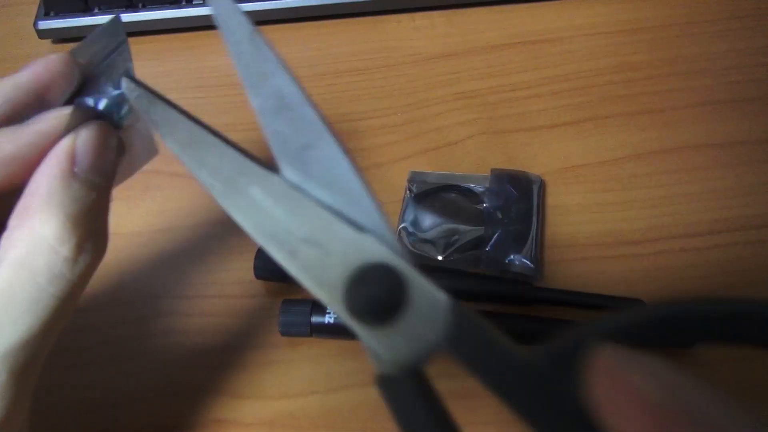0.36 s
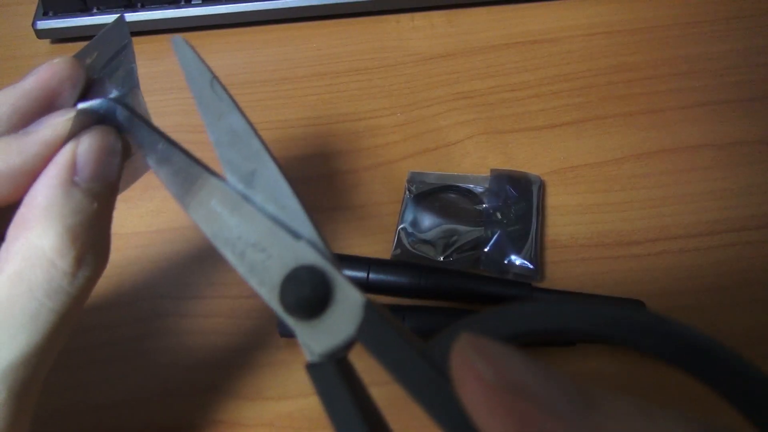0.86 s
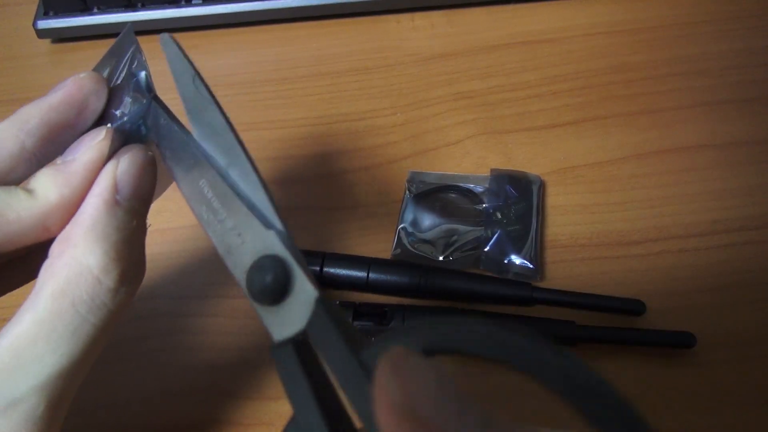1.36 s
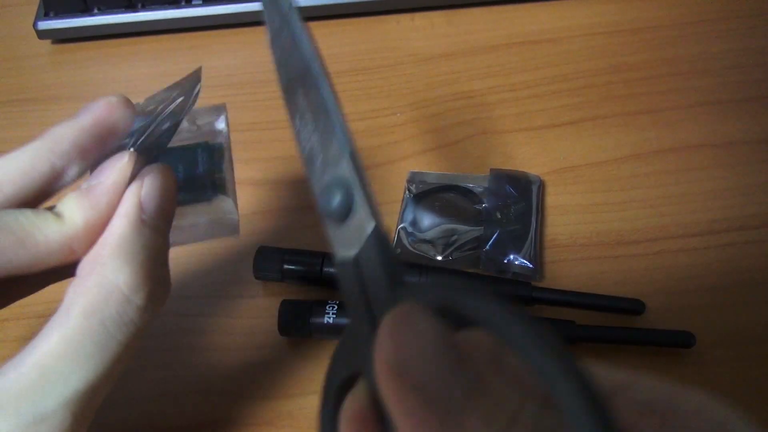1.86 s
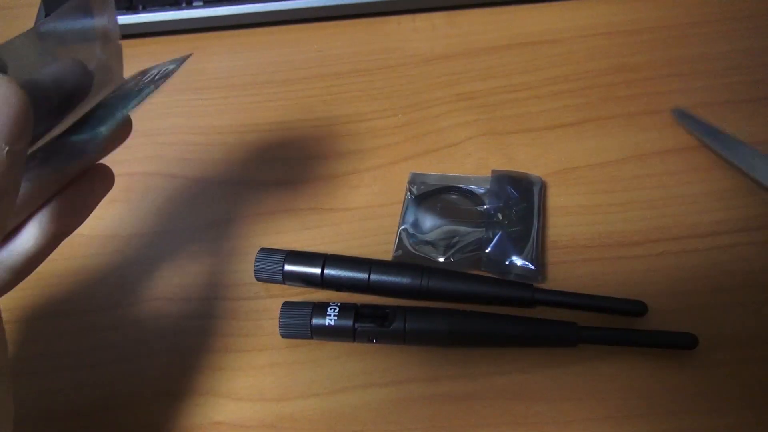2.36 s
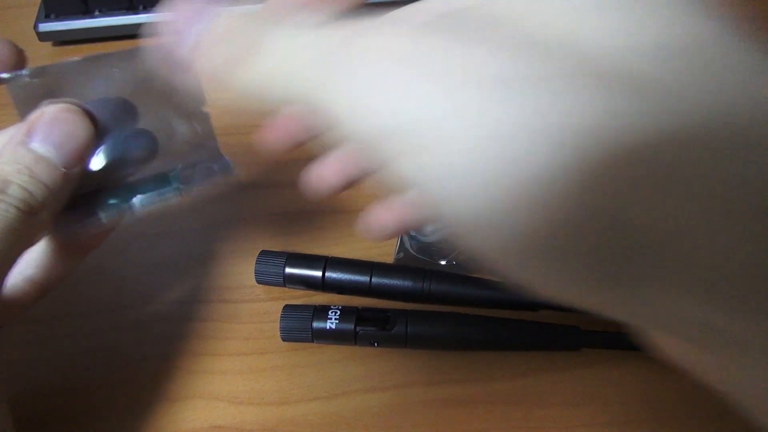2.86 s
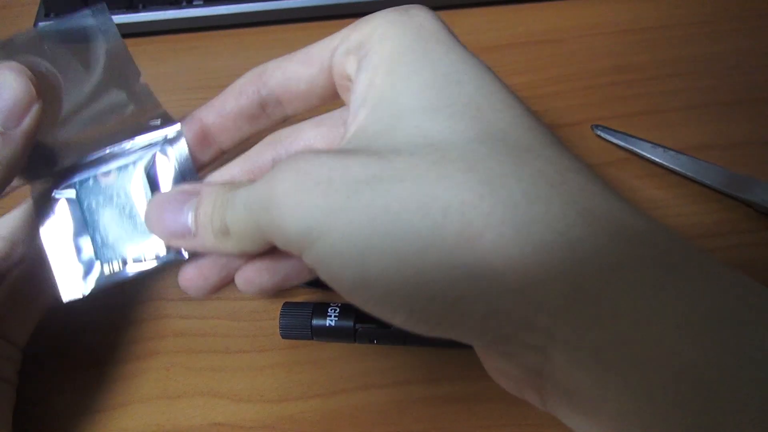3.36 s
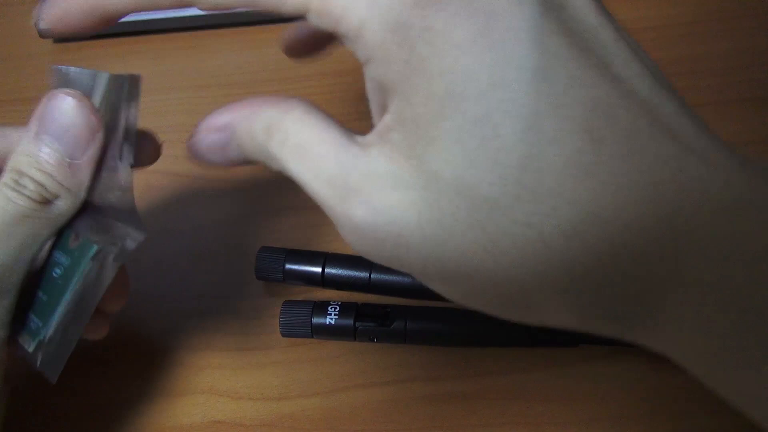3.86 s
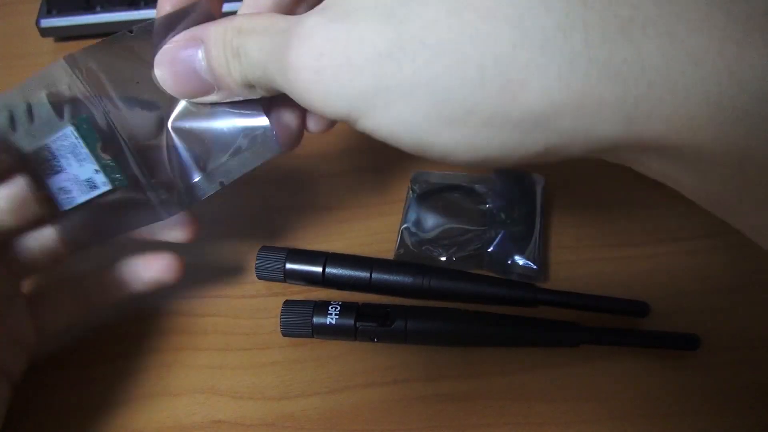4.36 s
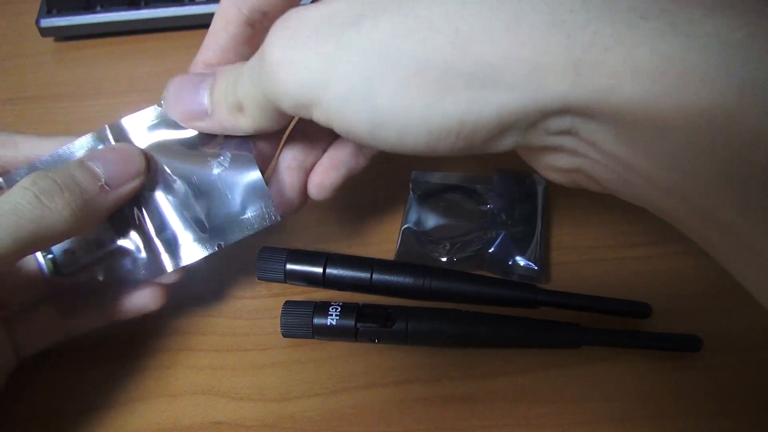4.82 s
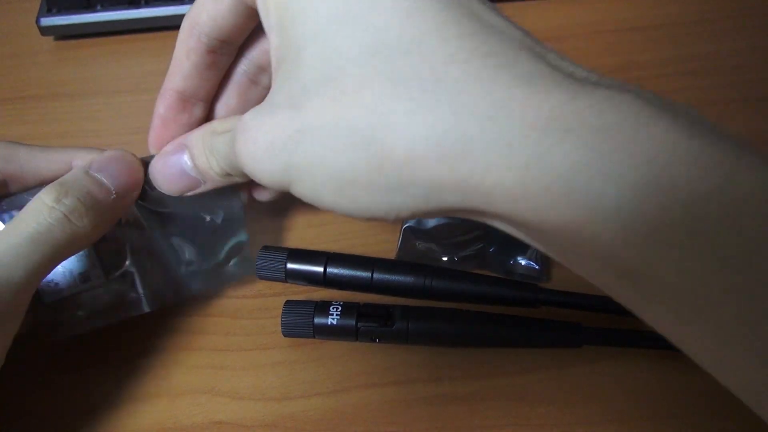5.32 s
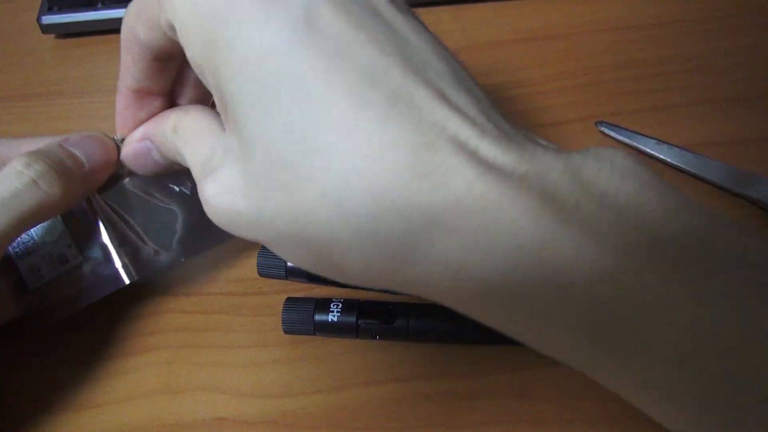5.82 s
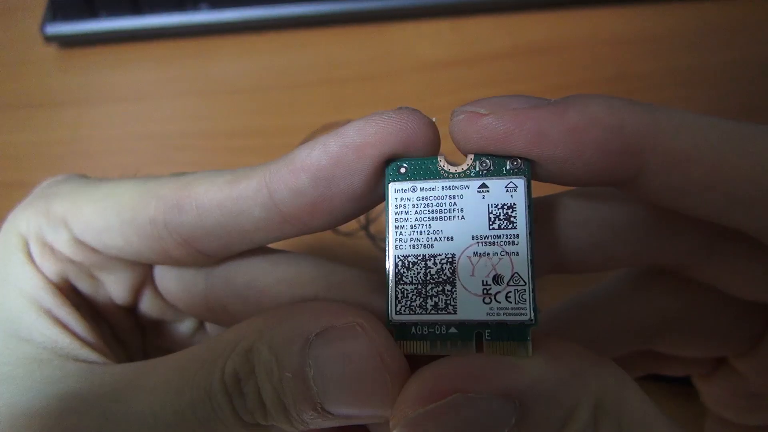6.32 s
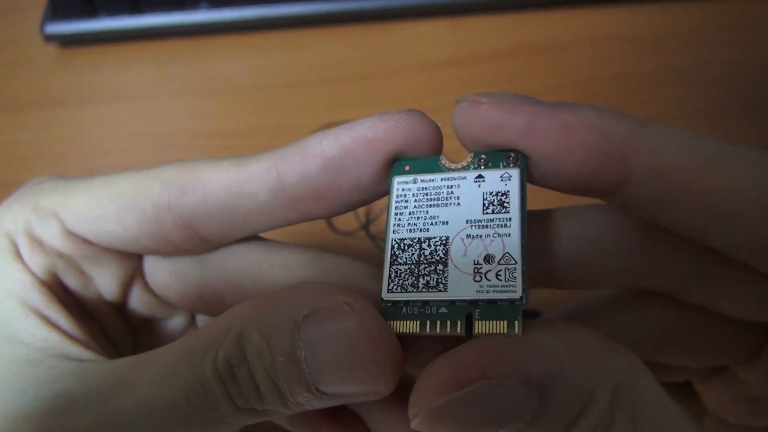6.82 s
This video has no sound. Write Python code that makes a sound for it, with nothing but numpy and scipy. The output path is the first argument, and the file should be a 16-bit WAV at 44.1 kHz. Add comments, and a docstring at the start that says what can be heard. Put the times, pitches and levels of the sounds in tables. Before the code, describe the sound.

A crisp scissor snip, a bouncing clatter of metal and plastic on wood, then dry, sharp crinkling of a small foil bag over soft room hiss.

```python
"""Foil bag and scissors on a desk

Close microphone over a wooden desk: hands squeeze a small foil bag, scissors snip it and are dropped on the desk,
then fingers rub and open the bag, whose creases snap. A quiet room hums and hisses behind.
Snaps, bounces and jolts are crowds of damped modes; rubs, snip and background are coloured noise.
A short diffuse tail gives the room, and two microphone ports give the stereo."""
import sys
import numpy as np
from scipy import signal
from scipy.fft import rfft, irfft, next_fast_len
from scipy.io import wavfile
from scipy.ndimage import map_coordinates

SR = 44100
rng = np.random.default_rng(int(sys.argv[2]) if len(sys.argv) > 2 else 0)


def file_out(sig):
    """Save sig as 16-bit WAV at sys.argv[1]."""
    # one column per channel
    cols = np.atleast_2d(sig).T
    # limit, then scale
    lim = np.clip(cols, -1, 1)
    pcm = np.round(lim * 32767).astype(np.int16)
    wavfile.write(sys.argv[1], SR, pcm)


def voltage_ratio(decibels):
    """Convert decibels (scalar or array-like) to amplitude ratios, 20 dB per decade."""
    exponent = np.asarray(decibels, float) / 20
    return 10 ** exponent


N = 306495  # length in samples

# creases snapping, and at 1.859 and 1.871 s the blades snipping, made alike: (time [s], strength [dB], pitch of
# the crease [Hz], focus: loss away from that pitch [dB per octave], strength of the whole bag's thump [dB])
SNAPS = [(0.1695, -26.5, 930, 3.0, -27), (0.1973, -24, 12000, 14, -47), (0.3873, -45.5, 7650, 8, -63.0),
         (0.8826, -39, 1690, 2.5, -44.5), (1.0047, -33, 1890, 3, -38.5), (1.5029, -28.5, 1960, 9, -45),
         (1.6301, -41.5, 1960, 9, -55), (1.6944, -47.5, 1930, 4, -72.0), (1.82, -20.5, 7240, 17, -46),
         (1.859, -11, 9100, 3, -27), (1.8714, -5.5, 11600, 8.5, -60), (2.1927, -27, 2370, 5, -36),
         (2.2114, -34, 680, 2.5, -36), (2.3048, -25, 3450, 6, -34), (2.3276, -25, 1580, 1.5, -22.5),
         (3.0111, -27.5, 1920, 3.5, -35.5), (3.087, -33, 10610, 5, -60.0), (3.0988, -41, 590, 8, -35.0),
         (3.1106, -39, 1690, 5, -45), (3.174, -34.0, 1970, 13.5, -63.0), (3.2013, -17.5, 2020, 20, -60),
         (3.2775, -12, 5240, 2, -32.5), (3.4945, -9.5, 3970, 5, -25.5), (3.553, -33.0, 590, 2.5, -29),
         (3.5746, -28.5, 590, 2.5, -31), (3.654, -12.0, 6600, 4, -31), (3.721, -43, 8500, -2, -45.0),
         (3.748, -12.5, 6800, 4.5, -22), (3.7858, -19.5, 5500, 7, -55.0), (3.7951, -23.5, 1930, 3, -55),
         (3.8051, -41.0, 590, 5, -45), (4.0329, -32, 830, 2.5, -32), (4.1163, -42.5, 6610, -0.5, -46.5),
         (4.1298, -42.5, 590, 3, -41), (4.1889, -19.5, 3280, 8.5, -54.5), (4.2179, -12, 1290, 5, -16.5),
         (4.2492, -9.5, 5000, 5, -21), (4.2543, -0.5, 2700, 8.5, -14), (4.2753, -32, 590, 1.5, -29.5),
         (4.3048, -17, 1970, 5.5, -27), (4.3194, -15.5, 2840, 8, -23.5), (4.3445, -34, 2620, 2, -34),
         (4.3602, -26.5, 1050, 5, -31.5), (4.3696, -10, 2560, 10.5, -26), (4.3814, -26, 1350, 6, -35),
         (4.402, -28, 1710, 7, -47.0), (4.5124, -32, 1110, 0.5, -28.5), (4.5667, -33.5, 3020, 6.5, -67.0),
         (4.638, -19, 2080, 10, -40), (4.653, -7.5, 2270, 6.5, -37.5), (4.7128, -30, 830, 1, -24.5),
         (4.8042, -28, 1770, 2.0, -28.5), (4.9, -40.5, 1630, 2.5, -43), (4.9619, -26.5, 5260, 2.5, -61),
         (4.9675, -23, 2370, 8.5, -48), (4.9795, -24, 2230, 14, -58.0), (5.044, -32.5, 5160, 7, -64.0),
         (5.124, -6, 3020, 11, -35), (5.1692, -32.5, 4050, 7, -60), (5.1766, -22.5, 6100, 13.5, -60.0),
         (5.3074, -35, 710, 4.5, -37.5), (5.4167, -34.5, 1300, 3, -37.0), (5.423, -38, 4700, 9, -58.0),
         (5.553, -32.5, 2000, 14, -51), (5.6681, -46.5, 3780, 4, -45), (5.7647, -12, 5720, 7.0, -36.0),
         (5.822, -21, 1370, 7, -33.5), (5.964, -37, 11700, 6.5, -70), (6.0031, -15.5, 1910, -0.5, -50),
         (6.05, -29, 3430, 6.5, -48), (6.1268, -42, 11810, 6.5, -69.0)]


def unit(x):
    """Scaled to rms 1."""
    return x / np.sqrt(np.mean(x ** 2) + 1e-20)


def along(points, hz):
    """(Hz, value) points read on a log frequency axis."""
    f, v = np.transpose(points)
    return np.interp(np.log(hz + 1), np.log(f + 1), v)


def above(x, hz):
    """High-pass: keeps deep bass out of the sound."""
    return signal.sosfilt(signal.butter(2, hz, "high", fs=SR, output="sos"), x)


def wobble(rate):
    """A smooth random curve, rate knots a second."""
    knots = rng.standard_normal(int(N * rate / SR) + 4)
    return map_coordinates(knots, [np.arange(N) * rate / SR])


def rush(spectrum):
    """Stereo noise of rms 1 in the given colour, its two sides more or less alike by frequency."""
    # likeness of left and right: (frequency [Hz], correlation [0 to 1])
    alike = [(60, 0.67), (300, 0.93), (1000, .9), (3000, 1), (7000, 0.92), (15000, 1)]
    size = next_fast_len(N)
    hz = np.fft.rfftfreq(size, 1 / SR)
    turn = np.arccos(np.clip(along(alike, hz), 0, 1)) / 2
    white = rfft(rng.standard_normal((2, size)))
    pair = white * voltage_ratio(along(spectrum, hz)) * [np.cos(turn), np.sin(turn)]
    mid, side = irfft(pair, size)[:, :N]
    return unit(np.array([mid + side, mid - side]))


def ring(hz, db, t60, rise_s, size, rough=0):
    """Damped modes at random phase and strength; rough lets each phase wander, as loose contact does."""
    t = np.arange(size)[:, None] / SR
    phase, scatter_db = rng.uniform(0, 2 * np.pi, len(hz)), rng.normal(0, 1.2, len(hz))
    wander = rough * np.cumsum(rng.standard_normal((size, len(hz))), axis=0) / np.sqrt(SR)
    decay = voltage_ratio(db + scatter_db - 60 * t / t60)
    modes = decay * np.sin(2 * np.pi * hz * t + phase + wander)
    return modes.sum(axis=1) * (1 - np.exp(-t[:, 0] / rise_s))


def air():
    """Wavering rumble, hum and mid murmur of machines under the microphone's hiss, all following one swell."""
    # course of the background, lowest near the end: (time [s], level [dB])
    course = [(0, -67), (.7, -71.5), (2.3, -70.5), (3.1, -66.5), (3.5, -64.5), (4, -68), (4.5, -68),
              (4.9, -67.5), (5.4, -66), (5.95, -69), (6.16, -70.5), (6.2, -75), (6.95, -73.5)]
    # rumble, hum, murmur, hiss: (level over the background [dB], how far it follows the swell [share])
    layers = [(-1, 0.74), (-2, 0.94), (.5, 1.05), (-1, 1)]
    # colours of the four layers: (frequency [Hz], level [dB])
    rumble_colour = [(20, -35), (30, -8), (80, 0), (150, -3), (230, -7.5), (350, -41.5)]
    hum_colour = [(190, -44), (235, -9), (255, -10.5), (280, -9.5), (330, -42.5)]
    murmur_colour = [(200, -16.5), (350, -2), (700, -6), (1500, -9.5), (2500, -14), (4000, -41)]
    hiss_colour = [(1500, -30.5), (2800, 0.5), (4000, -1), (7000, 0.5), (9000, -3), (12000, -2.5),
                   (15500, -3.5), (20000, -7.5)]
    s, db = np.transpose(course)
    swell_db = np.interp(np.arange(N) / SR, s, db - db.mean())
    rumble, hum, murmur, hiss = (voltage_ratio(db.mean() + over_db + follows * swell_db) for over_db, follows in layers)
    low = rumble * voltage_ratio(1.0 * wobble(6.2)) * rush(rumble_colour)
    low += hum * voltage_ratio(1.6 * wobble(4.4)) * rush(hum_colour)
    middle = murmur * voltage_ratio(0.8 * wobble(3.6)) * rush(murmur_colour)
    return low + middle + hiss * rush(hiss_colour)


def room(x):
    """A diffuse tail, drawn anew every quarter second, each frequency dying at its own speed."""
    # decay of the room: (frequency [Hz], t60 [s])
    decay = [(200, .28), (800, .28), (2000, .24), (6000, .24), (15000, .18)]
    out, step = np.zeros((2, N + 2 * SR)), SR // 4
    for start in range(0, N, step):
        hz, t, z = signal.stft(rng.standard_normal((2, SR // 3)), SR, nperseg=256)
        z[1] = 1.1 * z[0] + 0.2 * z[1]  # both sides nearly alike
        fading = z * voltage_ratio(-60 * t / along(decay, hz)[:, None])
        tail = signal.istft(fading, SR, nperseg=256)[1]
        wet = signal.fftconvolve(x[None, start:start + step], tail / np.linalg.norm(tail[0]), axes=1)
        out[:, start + 120:][:, :wet.shape[1]] += wet  # 120 samples after the direct sound
    return out[:, :N]


def jolts():
    """A soft low push wakes only the lowest modes of the desk."""
    # soft pushes of hand or handle on the desk top: (time [s], level [dB])
    pushes = [(1.859, -48), (2.446, -37.5), (2.585, -34), (2.997, -36), (3.21, -43), (3.748, -42),
              (4.034, -51.5), (4.218, -39), (4.253, -24.5), (4.319, -47), (4.802, -41.5), (5.306, -51),
              (5.762, -44.5)]
    hz, t60 = np.array([84, 127, 199.1, 251.0]), np.array([.06, .07, .08, .13])
    loss_db = np.array([14, 8.1, 3.6, 8.9])
    out, size = np.zeros(N + SR), SR // 5
    for s, db in pushes:
        out[round(s * SR):][:size] += ring(hz, db - loss_db, t60, rise_s=0.0053, size=size)
    return out[:N]


def snip():
    """The closed blades shimmer in a dense band of high modes, made as fading noise."""
    # the blades closing: (time [s], rms level at the start [dB])
    closing = (1.876, -45)
    # colour of the shimmer: (frequency [Hz], level [dB])
    shimmer = [(4500, -30), (6100, -9), (8300, -12), (9300, -2.5), (10600, 0), (11400, -11), (15500, -13)]
    t = np.arange(N) / SR - closing[0]
    fade = voltage_ratio(closing[1] - 60 * np.abs(t) / .32)  # t60 0.32 s
    return (t > 0) * fade * rush(shimmer)[0]


def scissors():
    """Every bounce thuds the desk, knocks the handles, clinks the blades with a short crack and leaves a rattle."""
    # bounces on the desk: (time [s], level of desk thud [dB], of handle knock [dB], of blade clink [dB])
    blows = [(2.417, -48.5, -55.5, -54), (2.4485, -24, -22, -14), (2.478, -29, -36.5, -20.5),
             (2.4914, -32, -35.5, -21.5), (2.509, -32.5, -24.5, -32.5), (2.5875, -12.5, -9, -25),
             (2.596, -16, -19.5, -22.5), (2.614, -37.5, -22, -13.5), (2.6279, -28, -27.5, -16.5),
             (2.6411, -23.5, -23, -29.5), (2.648, -26, -21.5, -34.5), (2.6634, -32, -38, -34.5),
             (2.6767, -31.5, -39.5, -37), (2.7514, -39, -25, -24), (2.7605, -20.5, -23, -20),
             (2.7867, -23.5, -21, -24), (2.811, -26.5, -49, -55), (2.8357, -28, -25.5, -34),
             (2.8467, -34.5, -30, -57), (2.992, -38.5, -45, -63), (3.0216, -36.5, -40.5, -52.5),
             (3.202, -43, -39.5, -51)]
    # modes of desk top, plastic handles and steel blades: (frequency [Hz], level [dB],
    # t60 [s], for handles and blades when fully free)
    desk = [(119, -13, 0.12), (206, -12.5, 0.13), (268.6, -8.5, 0.23), (420, -10, 0.086), (540, -2, 0.11),
            (695.7, -3, 0.15), (838.5, 1.5, 0.094)]
    handles = [(1223, -8, 0.24), (1302, -2, 0.25), (1405, -5.5, 0.26), (1603, -7.5, .16),
               (2030, -9.5, 0.23), (2387, -12.5, 0.31)]
    blades = [(2810, -11, 0.14), (3065, -20.5, 0.39), (3250, -11.5, .35), (3920, -11, 0.59),
              (4400, -14.5, 0.12), (5140, -8, 0.44), (5370, -10, .5), (6025, -11.5, 0.13),
              (6200, -11, 0.16), (6600, -13.5, 0.072), (7000, -9, 0.16), (7570, -10.5, .22),
              (8750, -11, 0.17), (9160, -10, 0.23), (9700, -22, .15), (10400, -16.5, .18),
              (11290, -16, .18), (11700, -18, .18), (14400, -30, .1)]
    # how freely handles and blades ring, less as the scissors lie flatter: (time [s], share of t60)
    freely = [(2.55, 1.1), (2.59, .3), (2.76, .25)]
    # how far the phase of desk, handle and blade modes wanders [radians per root second]
    loose = {"desk": 8, "handles": 17, "blades": 14}
    # dull rattle of loose parts after a bounce: (frequency [Hz], level [dB])
    rattle_colour = [(60, -33.5), (150, -14.5), (600, 10.5), (1400, -6), (3000, -7), (6000, -18.5),
                     (12000, -25), (16000, -40)]
    out, size = np.zeros(N + SR), SR // 3
    t, rattle = np.arange(size) / SR, rush(rattle_colour)[0]
    for s, thud_db, knock_db, clink_db in blows:
        start, freedom = round(s * SR), np.interp(s, *np.transpose(freely))
        hz, db, t60 = np.transpose(desk)
        blow = ring(hz, db + thud_db - 9, t60, rise_s=0.002, size=size, rough=loose["desk"])
        hz, db, t60 = np.transpose(handles)
        blow += ring(hz, db + knock_db - 6, t60 * freedom, rise_s=0.0004, size=size, rough=loose["handles"])
        hz, db, t60 = np.transpose(blades)
        blow += ring(hz, db + clink_db - 18, t60 * freedom, rise_s=0.00028, size=size, rough=loose["blades"])
        # the first contact chokes most of the ring
        blow += ring(hz, db + clink_db, 0.017, rise_s=0.00033, size=size)
        crack = np.diff(rng.standard_normal(size + 1))
        blow += voltage_ratio(clink_db - 15.5 - 60 * t / 0.027) * crack
        blow += voltage_ratio(thud_db - 15 - 60 * t / 0.13) * rattle[start:start + size]
        bright_rattle = np.diff(rattle[start:start + size + 1])  # from the pivot
        blow += voltage_ratio(clink_db - 15.5 - 60 * t / 0.25) * bright_rattle
        out[start:][:size] += blow
    return above(out[:N], hz=85)


def rubs():
    """Sliding contact: noise in four registers, roughened by stick-slip grains, shaped over each stroke."""
    # fingers and blades sliding on foil: (start [s], relative length, level [dB],
    # brightness [dB per octave], extra sizzle [dB])
    strokes = [(0.144, 0.062, -52, 4, -7), (0.265, 0.026, -77, 1.5, 5), (0.36, 0.05, -75, 1.5, 2),
               (0.935, 0.11, -73, 1.5, 2), (1.809, 0.02, -55.5, 5, 3.5), (1.829, 0.02, -52.5, 3.0, 0),
               (2.419, 0.033, -67.5, -2.5, -6), (3.083, 0.033, -63, 1, 1), (3.29, 0.07, -67.5, -8, -8),
               (3.51, 0.11, -76, -10, -6), (3.609, 0.043, -70.5, 4.0, 8), (3.656, 0.13, -48, -1.5, 3),
               (3.763, 0.044, -49, -9, -2), (3.913, 0.065, -73.5, 4.0, 2), (4.019, 0.099, -63.5, 0.0, 2),
               (4.173, 0.079, -59, 0.5, 6), (4.226, 0.12, -45.5, -1.5, -4), (4.333, 0.093, -56.5, -3.5, -7),
               (4.562, 0.054, -63, -0.5, 3), (4.665, 0.033, -67, 0, -8), (4.711, 0.019, -60, 1, 3),
               (4.834, 0.037, -65, 4, 2), (4.947, 0.048, -58.5, -2.5, 9), (5.03, 0.077, -60, -0.5, 6.5),
               (5.133, 0.079, -74, -6, -4), (5.205, 0.033, -57, 3.0, 4), (5.399, 0.026, -70, 0.5, 4),
               (5.432, 0.04, -63.5, -1.5, 0.5), (6.012, 0.11, -49.5, 0.5, -7),
               (6.827, 0.027, -79.5, 9, 3.5), (6.925, 0.032, -81, 12.5, 2)]
    # glint, sizzle, crack and body registers: (place above 4 kHz [octaves], level [dB])
    registers = [(1.42, -3), (.83, -1.5), (-0.36, -4), (-1.42, -2)]
    # treble colours of sliding foil, for glint and sizzle: (frequency [Hz], level [dB])
    glint = [(9000, -13.5), (9800, -6.5), (10700, -0.5), (11800, -4.5), (12700, -5), (14000, -17.5),
             (15800, -9)]
    sheen = [(5200, -12), (6200, -1), (7100, 2), (8000, -6.5), (9000, -7)]
    bands = [[(8200, -40.5)] + glint + [(18000, -33.0)],
             [(4400, -40)] + sheen + [(10000, -38.5)],
             [(1800, -40), (2500, -5.5), (3700, -1.5), (5500, -2.0), (7000, -38.0)],
             [(250, -43.0), (700, -3.0), (1400, -3.5), (1900, -1.5), (2600, -7), (3600, -38.5)]]
    grain = voltage_ratio(3.6 * wobble(450) + 1.3 * wobble(60))  # shared by all registers
    noise = np.array([unit(grain * voltage_ratio(1.6 * wobble(120)) * rush(band)[0]) for band in bands])
    stroke = np.zeros((len(bands), N + SR))
    octaves, register_db = np.transpose(registers)
    for s, length, db, brightness, sizzle_db in strokes:
        level_db = db + register_db + brightness * octaves + sizzle_db * np.array([0, 1, 0, 0])
        u = np.linspace(0, 1, round(length * 1.154 * SR))
        # foil springing back from a strong snap starts at once and fades
        sprung = any(0 < s - snap[0] < .014 and snap[1] > -20 for snap in SNAPS)
        onset = voltage_ratio(-1.5 - 26.4 * u) if sprung else np.minimum(u / .35, 1)
        swell = onset * np.minimum((1 - u) / 0.36, 1)
        stroke[:, round(s * SR):][:, :len(u)] += voltage_ratio(level_db[:, None] + 4.5) * swell
    return (noise * stroke[:, :N]).sum(axis=0)


def snaps():
    """Each buckling crease, or snip of the blades, thumps the bag and rings a new crowd of short modes,
    strongest around its own pitch."""
    # registers of the foil's dense, short resonances: (low edge [Hz], high edge [Hz],
    # level per mode [dB], t60 [s])
    foil = [(300, 1150, -10.5, 0.016), (1228, 2645, -10.5, 0.0087), (2890, 5500, -14.5, 0.011),
            (5840, 9500, -7, 0.0054), (9270, 15000, -12, 0.0072)]
    mode_counts = (4, 6, 6, 7, 8)  # one for each register
    steeper_above = 1.205  # factor on the loss in registers over the crease's pitch
    out, size = np.zeros(N + SR), SR // 20
    low, high = np.transpose(foil)[:2]
    for s, strength_db, pitch_hz, focus, thump_db in SNAPS:
        octaves = np.log2(np.sqrt(low * high) / pitch_hz)
        slope = focus * np.where(octaves > 0, steeper_above, 1)
        level_db = strength_db - slope * np.hypot(octaves, .2)
        level_db[0] = thump_db  # the lowest register is the whole bag
        for (low_hz, high_hz, db, t60), register_db, count in zip(foil, level_db, mode_counts):
            place = (np.arange(count) + rng.uniform(0, 1, count)) / count
            hz = low_hz * (high_hz / low_hz) ** place
            out[round(s * SR):][:size] += ring(hz, db + register_db, t60, rise_s=0.0002, size=size)
    echo = np.roll(out, round(.0011 * SR))  # once more off the desk top
    return above(out + voltage_ratio(-17) * echo, hz=240)[:N]


def between_ports(x):
    """The side signal: two close microphone ports hear level and phase differently by frequency."""
    # difference of the ports: (frequency [Hz], side level [dB], phase [radians])
    ports = [(40, -6.5, 3.1), (120, -7.5, 3.1), (300, -21, 2.5), (2000, -28, 1.6), (5000, -18.5, 1.6),
             (9000, -11, 1.6), (14020, -25, 1.6)]
    hz, (f, db, phase) = np.fft.rfftfreq(N, 1 / SR), np.transpose(ports)
    shade = voltage_ratio(along(np.c_[f, db], hz)) * np.exp(1j * along(np.c_[f, phase], hz))
    return irfft(rfft(x) * shade, N)


def scene():
    """The bag ends a little left, the scissors land a little right, with the room and its air around them."""
    bag, steel = snaps() + rubs() + snip() + jolts(), scissors()
    left_db = np.interp(np.arange(N) / SR, [2.3, 3.1], [.1, .95])  # the bag is carried to the left
    direct = bag * voltage_ratio([left_db, -left_db]) + steel * voltage_ratio([[-.2], [.2]])
    side = between_ports(bag + steel)
    return direct + [side, -side] + voltage_ratio(-14.5) * room(voltage_ratio(-2.0) * bag + steel) + air()


def top_cut(x):
    """Nothing passes above the cut-off."""
    return signal.sosfilt(signal.butter(12, 16970, fs=SR, output="sos"), x)


def record(dry):
    """A low-pass cuts the top treble steeply near 15.9 kHz."""
    # the low-pass: (frequency [Hz], level [dB])
    low_pass = [(20, 0), (15000, 0), (15850, -3), (15950, -20), (16900, -26), (17100, -70)]
    size = next_fast_len(N)
    colour = voltage_ratio(along(low_pass, np.fft.rfftfreq(size, 1 / SR)))
    mix = irfft(rfft(dry, size) * colour, size)[:, :N]
    return top_cut(mix)


dry = scene()
out = record(dry)
file_out(out)
```